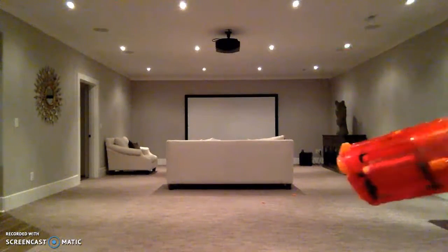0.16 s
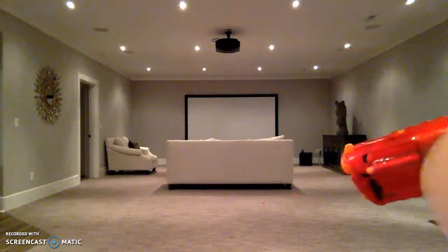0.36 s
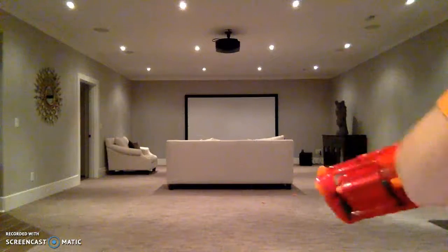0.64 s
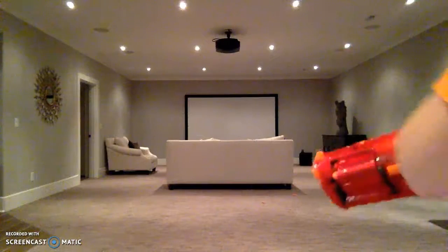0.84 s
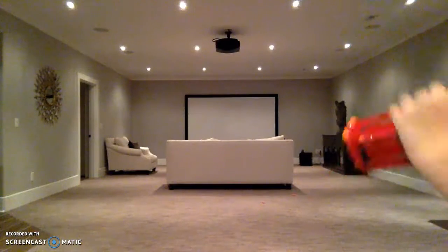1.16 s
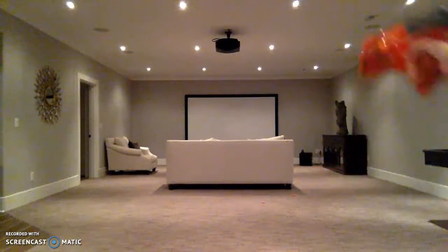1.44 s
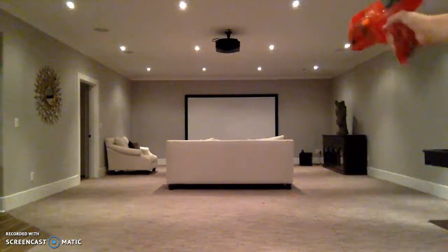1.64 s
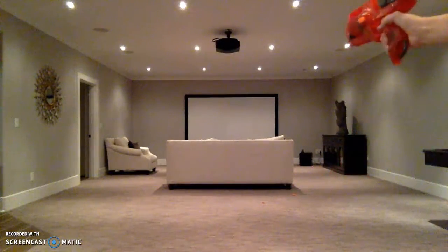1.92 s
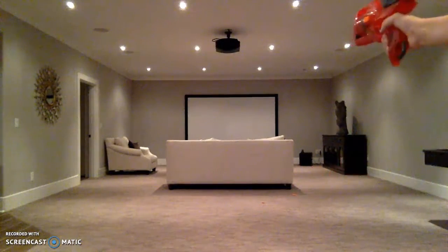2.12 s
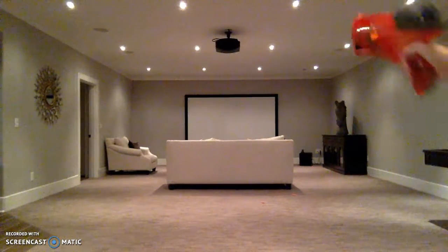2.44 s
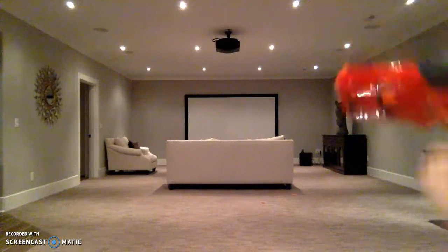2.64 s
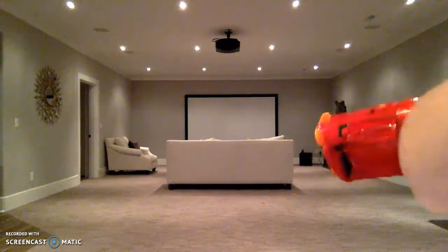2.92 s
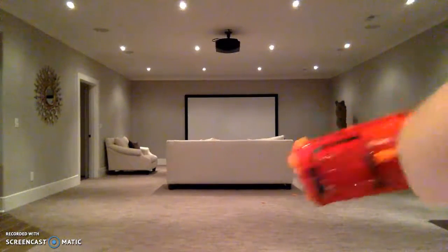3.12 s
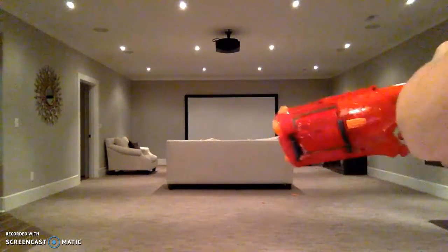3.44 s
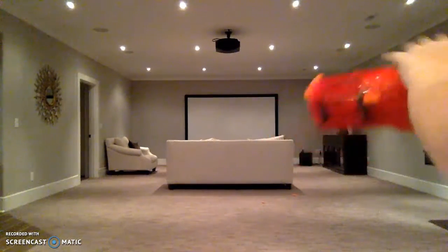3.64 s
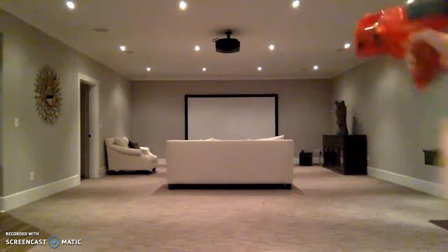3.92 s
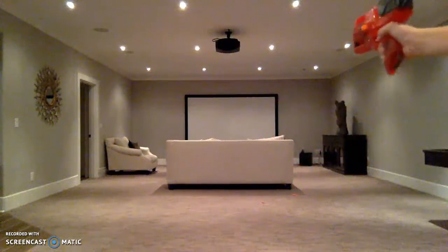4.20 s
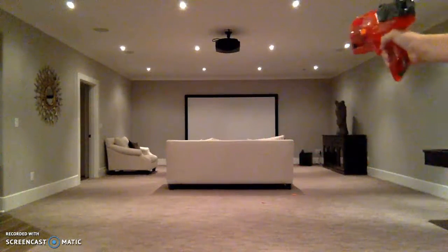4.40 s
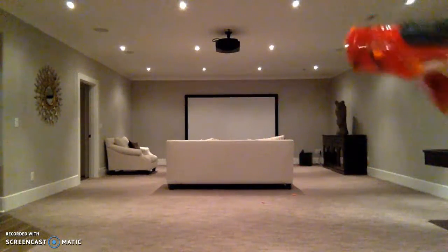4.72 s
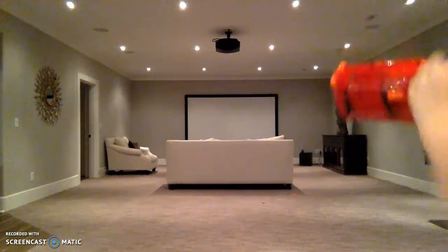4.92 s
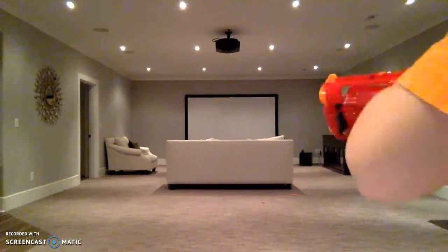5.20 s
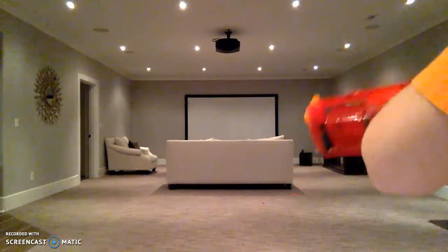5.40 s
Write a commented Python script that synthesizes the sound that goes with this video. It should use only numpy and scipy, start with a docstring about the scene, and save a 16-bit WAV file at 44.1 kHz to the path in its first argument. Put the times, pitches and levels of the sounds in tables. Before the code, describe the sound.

A spring-powered plastic dart blaster is handled close to a small microphone in a long carpeted room. The tail of an earlier bang hangs at the start. From about 0.4 s the slide rattles with sharp, dry clacks and faint scraping, latching with a loud snap at 0.7 s; it slams home at 1.07 s. Tiny handling knocks follow in a near-silent gap. At 2.16 s the plunger bangs, a fuller, punchy pop with a short ring, and a soft dull thump lands far away at 2.74 s. Priming resumes at 3.15 s, denser and louder, with the strongest snap at 3.37 s, a slam at 3.70 s and its clacking echo. A second shot pops at 4.40 s, with a fainter distant thump at 4.99 s. More bright clacks and scrapes run from 5.2 s to the end. Loud blows are slightly overloaded; room tails are choked by noise reduction over very faint hiss.

```python
"""A spring-powered foam dart blaster is primed and fired close to a small microphone in a long carpeted room.
Its slide rattles back, latches and slams home; each shot bangs the plunger: noise bursts in a resonant body.
About 0.6 s later the dart thumps down far away; noise bands ring on, reflections and a diffuse tail follow.
Loud blows overload the input, and a noise suppressor pulls faint sound down band by band."""
import sys
import numpy as np
from scipy import signal
from scipy.io import wavfile
from scipy.ndimage import uniform_filter1d

SR = 44100
rng = np.random.default_rng(int(sys.argv[2]) if len(sys.argv) > 2 else 0)


def unload_audio(sound):
    """Save the sound as a 16-bit wav file, at the path given as the first command line argument."""
    columns = np.transpose(np.atleast_2d(sound))
    # keep every value between -1 and 1, then stretch to whole-number steps
    steps = np.round(np.clip(columns, -1, 1) * 32767)
    wavfile.write(sys.argv[1], SR, steps.astype(np.int16))


N = 244755
TIME = np.arange(N) / SR

# In the blow tables t is the peak of the swell; the f column is the resonance of the struck part.
# slide and ratchet clack close by; the blow at 3.747 s is mostly the slam echoing off the far wall:
# t/s, level/dB, brightness/dB, rise/s, f/Hz
CLACKS = [(0.3795, -23.5, -0.5, 0.00068, 673), (0.4301, -22.5, 4.5, 0.0026, 6840),
          (0.462, -31, 3, 0.0024, 7160), (0.4882, -32, -3.5, 0.0055, 960), (0.5506, -20, 7.5, 0.0023, 4400),
          (0.5646, -24.5, 2.5, 0.00033, 572), (0.5777, -27, -2.5, 0.0019, 1880),
          (0.6746, -18, 3, 0.0047, 7670), (.857, -22, 2, 0.00069, 4800), (1.048, -26, 5.5, 0.00057, 1490),
          (1.0598, -25.5, 5, 0.0024, 758), (2.8297, -32, 4.5, 0.0024, 14300),
          (3.1448, -27.5, 3.5, 0.0027, 686), (3.1619, -16.5, -0.5, 0.0012, 3900),
          (3.1808, -27.5, 5.5, .0015, 3540), (3.2363, -19, 8, 0.0032, 4800),
          (3.249, -24, -0.5, 0.0023, 640), (3.2599, -29.5, -3.5, 0.003, 731),
          (3.295, -23.5, 0.5, 0.0049, 3680), (3.346, -13, 5.5, 0.0014, 3610),
          (3.4786, -30, -0.5, .005, 3840), (3.5099, -24.5, 2.5, 0.0016, 2170),
          (3.678, -31, 1, 0.0033, 2810), (3.7471, -14.5, -4.5, 0.0016, 1870),
          (4.6594, -36, 7, 0.0016, 14830), (5.1924, -31, -2, 0.0028, 2240),
          (5.2998, -26.5, 4, 0.0039, 3900), (5.3685, -25.5, 3, 0.0012, 11000),
          (5.3854, -26.5, -3, 0.0037, 11300), (5.481, -19, 4.5, 0.0025, 14770),
          (5.4971, -23.5, -1, .0015, 7040), (5.5064, -28, -0.5, 0.00062, 3770)]
# the slide reaches the back and the spring latches, close by: t/s, level/dB, after-ring level/dB
LATCHES = [(0.7001, -7.5, -24.5), (3.3666, -5, -27.5)]
# the slide slams home, close by: t/s, level/dB, brightness/dB, rise/s, f/Hz, t60/s, after-ring level/dB
SLAMS = [(1.067, -13, -3, 0.0044, 770, 0.048, -27.5), (3.697, -8, 0.5, 0.0032, 2470, 0.13, -19.5)]
# how each blow shares its force: thud level/dB, hollow level/dB, crack level/dB, edge level/dB
CLACK_BALANCE_DB = [-32, -3, 1, -1.5]
LATCH_BALANCE_DB = [-24.5, -3, 1.5, 1.5]
SLAM_BALANCE_DB = [-21, -5.5, 1, 2]
# resonances of the plastic shell: f/Hz, width/Hz, level/dB over the broad sound
SHELL = [(574.5, 70, 13), (693, 220, 12.5), (980, 420, 10), (1180, 40, 0), (2250, 1500, 9),
         (3530, 900, 6.5), (4225, 700, 8.5), (7580, 900, 5), (11500, 2100, 4), (15200, 900, 3.5)]
CLACK_T60_S, CLACK_ROOM_DB = 0.025, -1.5
LATCH_RISE_S, LATCH_T60_S, LATCH_ROOM_DB, LATCH_HZ = 0.00064, 0.023, -7.5, 4500
SLAM_ROOM_DB = -7


def priming():
    """The slide clacks, latches and slams home, one slam echo among the clacks, all coloured by the shell."""
    hits = [contact(*row, CLACK_T60_S, CLACK_BALANCE_DB, CLACK_ROOM_DB) for row in CLACKS]
    for s, level_db, _ in LATCHES:
        hits.append(contact(s, level_db, 0, LATCH_RISE_S, LATCH_HZ, LATCH_T60_S,
                            LATCH_BALANCE_DB, LATCH_ROOM_DB))
    hits += [contact(*row, SLAM_BALANCE_DB, SLAM_ROOM_DB) for *row, _ in SLAMS]
    return blows(hits, SHELL, low_hz=170, slope=0.55, part_db=6.0, part_q=6)


# the plunger hits the end of its tube, close by: t/s, level/dB, rise/s
SHOTS = [(2.1582, -12.5, 0.00071), (4.3982, -13, 0.0063)]
# force of a shot: thud level/dB, hollow level/dB, crack level/dB, edge level/dB
SHOT_BALANCE_DB = [-6, -1, 2, 7]
# resonances of the barrel: f/Hz, width/Hz, level/dB over the broad sound
BARREL = [(187.5, 200, 23), (408, 87, 1.7), (545, 22, 4.8), (717, 370, 17), (980, 150, 5.4),
          (1650, 310, 5.6), (1948, 66, 8.5), (2126, 100, 6.2), (2452, 660, 4.1), (3743, 1700, 11),
          (8200, 1700, 5.3), (14100, 3600, 9.7)]
SHOT_T60_S, SHOT_ROOM_DB, SHOT_HZ = 0.19, -1.2, 2086


def firing():
    """The plunger bangs in the barrel and shakes the whole body."""
    hits = [contact(s, level_db, 0, rise, SHOT_HZ, SHOT_T60_S, SHOT_BALANCE_DB, SHOT_ROOM_DB)
            for s, level_db, rise in SHOTS]
    # no one part stands far out
    return blows(hits, BARREL, low_hz=35, slope=.25, part_db=1.5)


# the slide rubs along its rails, close by: start t/s, end t/s, first level/dB, last level/dB
STROKES = [(.41, 0.662, -50, -57.5), (1.005, 1.044, -37, -36), (3.18, 3.313, -34.5, -47.5),
           (3.665, 3.69, -44, -31.5), (4.104, 4.226, -51, -48.5), (5.335, 5.398, -48, -35),
           (5.47, 5.536, -31, -44)]
# resonances of the coil spring: f/Hz, width/Hz, level/dB over the broad sound
SPRING = [(1200, 500, 5.1), (2100, 400, 3.4), (4440, 1300, 7.9), (6960, 220, 4.3), (11600, 470, 6.7),
          (15000, 800, 6)]
STROKE_FADE_S = 0.01   # time constant before and after a stroke
GRIP_CHANGE_S, GRIP_DB = 0.018, 0.5   # friction varies along the stroke


def slide(grains_per_s, spread_db, smooth_db):
    """Plastic sticks and slips on plastic, and the coil spring sings along."""
    is_slip = rng.random(N) < grains_per_s / SR
    slips = is_slip * rng.choice([-1, 1], N) * from_db(spread_db * rng.random(N))
    rub = rms_one(slips) + from_db(smooth_db) * rng.standard_normal(N)
    push = np.zeros(N)
    for start, end, first_db, last_db in STROKES:
        stroke = from_db(np.interp(TIME, [start, end], [first_db, last_db]))
        time_outside = np.abs(TIME - np.clip(TIME, start, end))
        push += stroke * np.exp(-time_outside / STROKE_FADE_S)
    wander = uniform_filter1d(rng.standard_normal(N), size=int(GRIP_CHANGE_S * SR))
    grip = from_db(GRIP_DB * rms_one(wander))
    return push * grip * rms_one(band(resonate(rub, SPRING), 550, 9000, order=1))


# soft knocks of hand and trigger on the shell, and (at 4.987 s) the second dart's first tick as it lands:
# t/s, level/dB, brightness/dB, f/Hz, after-ring level/dB
KNOCKS = [(.2964, -48.5, 11, 4080, -48), (1.5215, -44, -2, 1730, -40), (1.644, -52, -5, 3430, -60),
          (2.1371, -35.5, -9, 3775, -46.5), (2.9855, -33, -2, 2440, -50.5), (2.9947, -44.5, -16, 594, -56),
          (3.655, -34.5, -1, 1230, -41.5), (4.224, -43.5, -5.5, 2400, -49.5), (4.987, -45, 12, 3600, -56.5),
          (5.2664, -37.5, 3, 4040, -59)]
# force of a knock: thud level/dB, hollow level/dB, crack level/dB, edge level/dB
KNOCK_BALANCE_DB = [-31, -9.5, 1.5, -7]
KNOCK_RISE_S, KNOCK_T60_S, KNOCK_ROOM_DB = .0025, 0.045, -5.5


def soft_knocks():
    """Soft knocks, and one dart's first tick, wake little but the part that is struck."""
    hits = [contact(s, level_db, bright_db, KNOCK_RISE_S, hz, KNOCK_T60_S, KNOCK_BALANCE_DB, KNOCK_ROOM_DB)
            for s, level_db, bright_db, hz, _ in KNOCKS]
    return blows(hits, SHELL, low_hz=170, slope=1.0, part_db=12.5)


# soft foam lands across the room: t/s, level/dB, f/Hz of the struck spot
DARTS = [(2.739, -37, 1040), (4.9937, -41.5, 640)]
# force of a landing: thud level/dB, hollow level/dB, crack level/dB, edge level/dB
DART_BALANCE_DB = [-9.5, 2.5, -1.5, -10.5]
# resonances of the landing: f/Hz, width/Hz, level/dB over the broad sound
LANDING = [(151.7, 40, 2.3), (273, 380, 48), (520, 90, 3.4), (674, 320, 3.4), (980, 170, 5.1),
           (1770, 350, 4), (3826, 320, 7.9), (7060, 220, 15)]
DART_RISE_S, DART_T60_S, DART_ROOM_DB = 0.0023, 0.17, 3.8


def landings():
    """Each dart comes down with a dull, distant thump."""
    hits = [contact(s, level_db, 0, DART_RISE_S, hz, DART_T60_S, DART_BALANCE_DB, DART_ROOM_DB)
            for s, level_db, hz in DARTS]
    return blows(hits, LANDING, low_hz=87, slope=0.45, part_db=2)


# edges of the four registers thud, hollow, crack and edge: f/Hz
REGISTERS = [35, 400, 1400, 6000, 17000]
PART_LIFT_DB = 3.5   # the register that holds the struck part's resonance stands out


def contact(s, level_db, bright_db, rise, part_hz, t60, balance_db, room_db):
    """One blow as the body feels it: a harder contact tips force from the hollow register to the edge."""
    holds_part = np.diff(np.greater(REGISTERS, part_hz).astype(int))
    tilt_db = bright_db * np.array([0, -1, 0, 1])
    levels_db = level_db + np.array(balance_db) + tilt_db + PART_LIFT_DB * holds_part
    return (s, *levels_db, rise, t60, room_db, part_hz)


# how long each register rings, thud to edge: share of the blow's t60
RING_SHARE = [0.77, 1.875, 1, .9]


def blows(table, modes, low_hz, slope, part_db, part_q=5):
    """Tight clusters of contacts swell and die in a resonant body; returns direct sound and room feed."""
    chatter = band(resonate(rng.standard_normal(N), modes), low_hz, SR / 2, order=1)
    # one-pole filter: a larger slope is duller
    chatter = signal.lfilter([1], [1, -np.clip(slope, 0, .98)], chatter)
    registers = np.array([band(chatter, low, high, order=4)
                          for low, high in zip(REGISTERS, REGISTERS[1:])])
    direct, feed = np.zeros(N), np.zeros(N)
    for s, *levels_db, rise, t60, room_db, part_hz in table:
        span = slice(int((s - .02) * SR), int((s + 2 * t60) * SR))
        age = TIME[span] - s
        own = resonate(registers[:, span], [(part_hz, part_hz / part_q, part_db)])
        swell = np.clip(1 + age / rise, 0, 1) ** 2
        decay = np.exp(-np.log(1000) * np.maximum(age, 0) / t60 / np.c_[RING_SHARE])
        envelopes = swell * decay
        # the force of the blow sets the energy of each register
        energy = np.sum((own * envelopes) ** 2, axis=1) / np.sum(envelopes ** 2, axis=1)
        own /= np.sqrt(energy)[:, None]
        blow = from_db(levels_db) @ (own * envelopes)
        direct[span] += blow
        feed[span] += from_db(room_db) * blow
    return direct, feed


# what rings on after each kind of blow: f/Hz, width/Hz, level/dB re the blow or its after-ring, t60/s
LATCH_RINGS = [(1172, 480, 0.5, 0.54), (5100, 1600, 1.5, 0.39)]
SLAM_RINGS = [(453, 180, 1, 0.24), (800, 400, -9, .4)]
SHOT_RINGS = [(170, 150, -26.5, 0.22)]
DART_RINGS = [(156, 45, -0.5, 0.35), (286, 51, 4, 0.26), (953, 540, 7.5, 0.45), (1890, 900, -7, 0.45)]
KNOCK_RING_Q, KNOCK_RING_T60_S = 7.3, 0.24   # the struck part rings on at its own pitch


def ringing():
    """Spring, shell and room modes sing on after the blows that wake them."""
    knocked = np.zeros(N)
    for s, *_, hz, ring_db in KNOCKS:
        knocked += rings([(s, ring_db)], [(hz, hz / KNOCK_RING_Q, 0, KNOCK_RING_T60_S)])
    latched = rings([(s, ring_db) for s, *_, ring_db in LATCHES], LATCH_RINGS)
    slammed = rings([(s, ring_db) for s, *_, ring_db in SLAMS], SLAM_RINGS)
    return knocked + latched + slammed + rings(SHOTS, SHOT_RINGS) + rings(DARTS, DART_RINGS)


def rings(hits, modes):
    """Clusters of close modes beat as they fade; narrow ones take longer to build."""
    out, age = np.zeros(N + SR), TIME[:SR]
    for s, level_db, *_ in hits:
        for hz, width, db, t60 in modes:
            cluster = rms_one(band(rng.standard_normal(SR), hz - width / 2, hz + width / 2))
            envelope = np.minimum(age * width, 1) * np.exp(-np.log(1000) * age / t60)
            out[int(s * SR):][:SR] += from_db(level_db + db) * cluster * envelope
    return out[:N]


# single reflections from ceiling, side wall and far wall: delay t/s, level/dB
ECHOES = [(0.0104, -23), (0.019, -16.5), (.0565, -13.5)]
# colour of the diffuse sound: f/Hz, level/dB per Hz
ROOM_COLOUR = [(60, -11), (110, -6.5), (170, 2), (300, -3.5), (650, -1.5), (1200, 0), (2000, 2),
               (2900, -6.5), (4200, -5), (6000, -3.5), (10000, -7.5), (16000, -8.5)]


def room(feed, build_s, diffuse_db):
    """A few distinct reflections, then a diffuse tail that builds up and changes as the blaster moves."""
    echoes = sum(from_db(db) * np.interp(TIME - s, TIME, feed, left=0) for s, db in ECHOES)
    out = band(echoes, 250, 13000, order=1)
    build = from_db(diffuse_db) * (1 - np.exp(-(TIME[:SR] / build_s) ** 2))
    poses, step = np.linspace(0, TIME[-1], 9, retstep=True)
    for s in poses:
        # neighbouring poses cross-fade, each with its own tail
        share = np.sqrt(np.maximum(1 - np.abs(TIME - s) / step, 0))
        out += signal.oaconvolve(feed * share, build * reverberation(ROOM_COLOUR))[:N]
    return out


# decay time of the room: f/Hz, t60/s
ROOM_T60 = [(60, 0.27), (170, 0.35), (340, 0.6), (700, 0.67), (1400, 0.9), (2000, 0.65), (4000, 0.67),
            (5500, 0.87), (7700, 0.36), (11000, 0.52), (16000, 0.34)]


def reverberation(colour):
    """Diffuse noise bands, each dying at the room's rate for its pitch; colour gives the energy per Hz."""
    age, edges = TIME[:SR], np.geomspace(45, 18000, 22)
    out = np.zeros(SR)
    for low, high in zip(edges, edges[1:]):
        hz = np.sqrt(low * high)
        t60 = np.clip(at_hz(ROOM_T60, hz), .15, 1)
        noise = band(rng.standard_normal(2 * SR), low, high)[SR:]   # skip the filter's start
        tail = rms_one(noise * np.exp(-np.log(1000) * age / t60))
        out += tail * from_db(at_hz(colour, hz)) * np.sqrt(2 * (high - low)) / SR
    return out


# colour of an earlier bang that still dies away: f/Hz, level/dB per Hz
OPENING = [(60, -32), (200, -12), (600, -8.5), (1000, -2), (1350, 3.5), (2200, -10), (4000, -9.5),
           (7000, -18), (16000, -34)]
# what still rings from it: f/Hz, width/Hz, level/dB re the tail, t60/s
OPENING_RINGS = [(1330, 200, 8, .77), (4000, 700, 0, .4)]


def opening(level_db):
    """The last of an earlier bang hangs in the room."""
    tail = from_db(level_db) * rms_one(reverberation(OPENING))
    tail = np.pad(tail, (0, N - SR)) + rings([(0.0084, level_db)], OPENING_RINGS)
    return tail * np.minimum(TIME / .004, 1)


def background_hiss():
    """Faint steady noise, strongest from the low mids to the lower treble."""
    return from_db(-66.5) * rms_one(band(rng.standard_normal(N), 270, 2000, order=1))


def from_db(db):
    """Decibels to gain."""
    return 10 ** (np.asarray(db) / 20)


def rms_one(x):
    """Scale to unit rms."""
    return x / np.sqrt(np.mean(x ** 2) + 1e-20)


def at_hz(points, hz):
    """Read a table on a log-frequency axis."""
    table = np.array(points)
    return np.interp(np.log(hz), np.log(table[:, 0]), table[:, 1])


def band(x, low_hz, high_hz, order=2):
    """Butterworth band-pass."""
    edges = [low_hz, min(high_hz, SR * .45)]
    return signal.sosfilt(signal.butter(order, edges, "band", fs=SR, output="sos"), x)


def resonate(x, modes):
    """A chain of resonances, each lifting its own neighbourhood."""
    for hz, width, db in modes:
        b, a = signal.iirpeak(hz, hz / width * from_db(db / 2), fs=SR)
        x = x + (from_db(db) - 1) * signal.lfilter(b, a, x)
    return x


def scene():
    """Blaster near the microphone, darts far off, all in one room over a faint hiss."""
    direct, feed = np.sum([priming(), soft_knocks(), firing(), landings()], axis=0)
    rub = slide(grains_per_s=1800, spread_db=16, smooth_db=-3)
    reflected = room(feed + from_db(-1.5) * rub, build_s=0.0056, diffuse_db=-3.0)
    return direct + rub + ringing() + opening(level_db=-43.0) + reflected + background_hiss()


# noise suppressor: top of band f/Hz, threshold level/dB
SUPPRESSOR = [(350, -65.5), (1400, -40.5), (3200, -42), (5500, -44.5), (9000, -40.5), (17000, -41)]


def suppress(x, ratio, depth_db):
    """In each band, sound below the threshold is turned down, the more the fainter it is."""
    out, rest = np.zeros(N), x
    for top_hz, threshold_db in SUPPRESSOR:
        part = signal.sosfiltfilt(signal.butter(4, top_hz, fs=SR, output="sos"), rest)
        rest = rest - part
        power = np.abs(uniform_filter1d(part ** 2, size=900))   # over about 20 ms
        level_db = 10 * np.log10(power + 1e-14)
        out += part * from_db(-np.clip(ratio * (threshold_db - level_db), 0, depth_db))
    return out


# port resonance of the microphone: f/Hz, width/Hz, level/dB
MICROPHONE = [(15300, 1500, 1.5)]
CUTOFF_HZ = 16000


def record(dry):
    """Microphone resonance, noise suppression, faint hiss, slightly lopsided overload, and a steep top cut."""
    top, lopsided = .76, 0.013   # overload scale in full-scale units, and its offset
    picked_up = resonate(dry, MICROPHONE)
    clean = suppress(picked_up, ratio=0.78, depth_db=23)
    clean = clean + from_db(-84.5) * rng.standard_normal(N)
    clipped = top * (np.tanh(clean / top + lopsided) - np.tanh(lopsided))
    return signal.sosfilt(signal.ellip(9, .2, 70, CUTOFF_HZ, fs=SR, output="sos"), clipped)


dry = scene()
out = record(dry)
unload_audio(out)
```